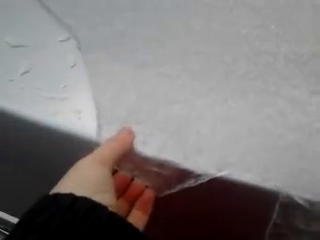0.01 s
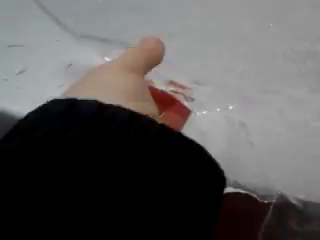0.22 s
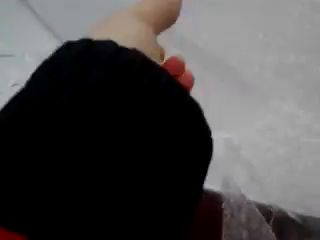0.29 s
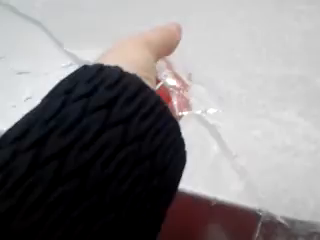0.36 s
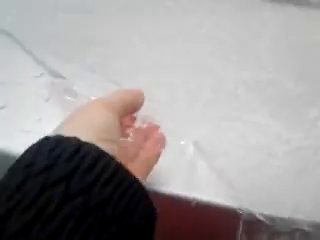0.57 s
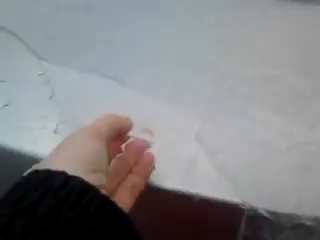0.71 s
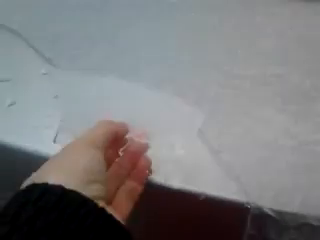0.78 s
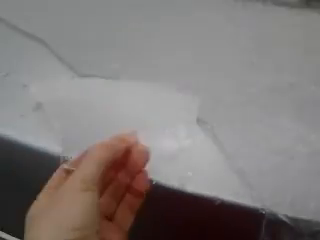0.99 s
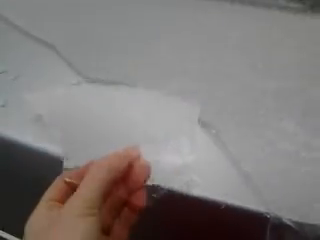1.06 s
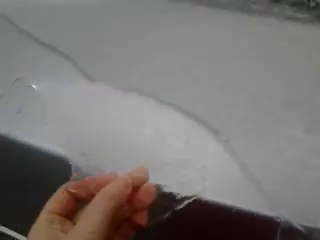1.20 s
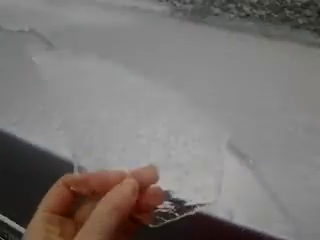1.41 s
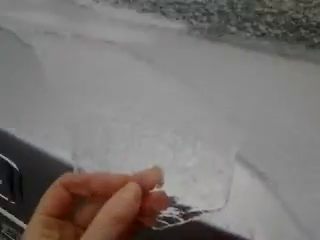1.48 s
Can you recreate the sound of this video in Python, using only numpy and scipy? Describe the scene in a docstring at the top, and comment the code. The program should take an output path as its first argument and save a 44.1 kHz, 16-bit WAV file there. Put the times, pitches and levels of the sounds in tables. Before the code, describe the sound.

A thin sheet of glaze ice snaps sharply off a car panel in quick brittle cracks

```python
"""A faint scrape and a little grit over a quiet outdoor hiss, then ice breaking close by:
a hand prises a sheet of glaze ice off a car's body.
The sheet snaps in quick runs of tiny fractures that knock the slab, ring the sheet and set shards off.
The metal panel below thumps as the load lets go: a short low push, then a damped ring.
Grit, scrapes, a sleeve's rustle and the outdoor air are noise, each with its own colour and loudness."""
import sys
import numpy as np
from scipy import signal
from scipy.fft import rfft, irfft, next_fast_len
from scipy.io import wavfile

SR = 44100
rng = np.random.default_rng(int(sys.argv[2]) if len(sys.argv) > 2 else 0)


def persist_wave(psi):
    """Save psi, clipped to +-1, as 16-bit WAV."""
    counts = np.round(np.clip(psi, -1, 1) * 32767).astype(np.int16)
    wavfile.write(sys.argv[1], SR, np.atleast_2d(counts).T)


N = 70560  # length in samples

GRAIN_SCATTER_DB = 3.5  # uneven strength of single grains, in grit and scrapes


def amp(db):
    """Turn decibels into a gain."""
    return 10 ** (np.asarray(db) / 20)


def unit(x):
    """Scale a sound to an rms of 1."""
    return x / np.sqrt(np.mean(x ** 2) + 1e-20)


def along(points, hz):
    """Read a curve of (Hz, value) points at any frequency, on a log axis."""
    point_hz, values = np.transpose(points)
    return np.interp(np.log(hz + 1), np.log(point_hz + 1), values)


def level(rows):
    """Gain for every sample from (s, dB) points; the end values hold outside them."""
    return amp(np.interp(np.arange(N) / SR, *np.transpose(rows)))


def filtered(x, response):
    """Multiply the spectrum of x by a response that depends on frequency."""
    size = next_fast_len(2 * len(x))  # room for the filter's tail
    spectrum = rfft(x, size) * response(np.fft.rfftfreq(size, 1 / SR))
    return irfft(spectrum, size)[:len(x)]


def coloured(x, colour):
    """Shape noise with a curve of (Hz, dB) points, at an rms of 1."""
    return unit(filtered(x, lambda hz: amp(along(colour, hz))))


def resonance(f, hz, width):
    """One thing that rings at hz: the narrower its width, the longer it rings."""
    return 1j * f * width / (hz * hz - f * f + 1j * f * width)


def add(track, s, sound):
    """Mix a sound into the track at s seconds."""
    i = max(round(s * SR), 0)
    track[i:i + len(sound)] += sound[:len(track) - i]


def cracks():
    """Every fracture knocks the whole slab, rings the ice sheet and sets small shards off."""
    # Each row: start in seconds, time the fracture runs in seconds, knock level in dB, knock pitch in Hz,
    # ring level in dB, ring pitch in Hz, splinter level in dB, splinter pitch in Hz.
    crack_rows = [(0.07, 0.0035, -73, 950, -56, 4390, -45, 8750),
                  (0.2068, 0.0037, -32, 1460, -26, 2072, -20.5, 7200),
                  (0.2128, 0.0028, -26, 1410, -12.5, 2200, -11.5, 6830),
                  (0.2201, 0.0027, -20.5, 1330, -11, 3088, -16, 6700),
                  (0.229, 0.006, -30.5, 1230, -26.5, 1810, -32.5, 6550),
                  (0.257, 0.0054, -45, 1460, -41, 1830, -44, 9100),
                  (0.2628, 0.0043, -43, 1170, -37.5, 1840, -41.5, 7480),
                  (0.319, 0.006, -44, 1010, -39.5, 3140, -64, 6980),
                  (0.338, 0.006, -30, 880, -29, 2930, -29.5, 9100),
                  (0.3428, 0.0017, -24.5, 1200, -14, 2780, -18, 6350),
                  (0.372, 0.0005, -36, 1040, -39, 2870, -38, 9000),
                  (0.386, 0.0031, -43, 1160, -25.5, 2760, -34, 6700),
                  (0.4217, 0.0059, -30, 1480, -21.5, 2080, -20.5, 7300),
                  (0.433, 0.011, -35, 710, -30, 1990, -29, 9400),
                  (0.4498, 0.00098, -24.5, 690, -20.5, 2330, -31.5, 7100),
                  (0.461, 0.0033, -32, 687, -44, 2240, -46, 8760),
                  (0.4749, 0.0029, -29, 734, -28.5, 2068, -28.5, 6700),
                  (0.4905, 0.0034, -42, 815, -58, 1980, -47, 7030),
                  (0.6555, 0.00088, -28, 786, -17, 2370, -24, 8860),
                  (0.6598, 0.0016, -26, 853, -25.5, 2763, -25, 8000),
                  (0.7604, 0.0023, -51, 603, -47, 2050, -47, 7750),
                  (0.778, 0.00043, -40.5, 1270, -38.5, 2270, -39, 7400),
                  (0.791, 0.003, -51, 1370, -41, 2080, -62, 6920),
                  (0.8038, 0.00067, -50, 650, -44, 2120, -69, 8900),
                  (0.8175, 0.001, -53, 1370, -43, 2140, -65, 8810),
                  (0.8252, 0.0046, -53, 1440, -39, 2235, -48, 8740),
                  (0.8396, 0.0016, -44, 1280, -47.5, 2180, -64, 8610),
                  (0.8448, 0.00097, -43.5, 960, -38, 2170, -43.5, 6770),
                  (0.9512, 0.0046, -58.5, 597, -40.5, 3510, -36, 7220),
                  (0.964, 0.0061, -41.5, 900, -54, 2610, -42, 9300),
                  (0.9732, 0.002, -48, 880, -46.5, 2320, -50, 8500),
                  (0.9874, 0.0017, -36.5, 850, -48, 3100, -58, 6830),
                  (1.0036, 0.0046, -64, 690, -44, 3040, -41.5, 7200),
                  (1.0474, 0.00041, -72, 750, -52.5, 2040, -42.5, 8700),
                  (1.073, 0.00073, -78, 990, -48, 3190, -54, 6330),
                  (1.095, 0.0018, -60, 1060, -41.5, 3600, -38, 11000),
                  (1.1044, 0.0004, -74, 1080, -41, 3040, -44.5, 6900),
                  (1.1942, 0.0026, -33.5, 1026, -43, 3230, -43, 7020),
                  (1.1992, 0.00084, -35.5, 950, -34.5, 2220, -31, 7460),
                  (1.3008, 0.003, -61, 800, -66, 2360, -43, 8900)]
    # What rings: the slab knocking on the panel, the ice sheet, the small shards.
    # Each row: pitch in Hz, width in Hz, strength in dB per Hz of width, relative to the other rows.
    slab_modes = [(450, 230, 0.5), (667, 120, 2), (836, 193, -3), (1068, 80, 0), (1440, 520, -5)]
    sheet_modes = [(1658, 230, -7), (1963, 132, 2), (2160, 110, 2), (2530, 240, -1), (2792, 165, 0.5),
                   (3025, 140, -1), (3264, 240, 0), (3730, 300, -1), (4240, 320, 0.5), (4620, 175, 2.5),
                   (5600, 740, -5.5)]
    shard_modes = [(5770, 130, -7.5), (6180, 120, 1.5), (6810, 380, 2), (7620, 400, 1.5), (8900, 540, 2.5),
                   (9900, 720, -0.5), (11150, 1300, -5.5), (13200, 630, -1.5), (15100, 1200, -7)]
    knock_octaves, ring_octaves, splinter_octaves = 0.86, 0.68, 0.65  # spread about each pitch
    out = np.zeros(N)
    for s, run_s, knock_db, knock_hz, ring_db, ring_hz, splinter_db, splinter_hz in crack_rows:
        force = fracture(run_s, max(knock_db, ring_db))
        knock = amp(knock_db) * struck(force, slab_modes, knock_hz, knock_octaves)
        ring = amp(ring_db) * struck(force, sheet_modes, ring_hz, ring_octaves)
        splinter = amp(splinter_db) * struck(force, shard_modes, splinter_hz, splinter_octaves)
        add(out, s, knock + ring + splinter)
    return bent(out)


def fracture(run_s, size_db):
    """A burst of tiny uneven fractures grows, runs out and leaves crumbs; small cracks break more cleanly."""
    rise_share = 0.2  # part of the run spent growing
    spiky_db = 1.5  # scatter of the tiny fractures
    crumble_db, crumble_s = -10.5, 0.03  # crumbs of a big crack, and the time they take to fall 60 dB
    big_crack_db, cleaner_per_db = -31, 1  # below this size, each dB smaller makes the crumbs weaker
    t = np.arange(SR // 12) / SR
    u = t / max(run_s, 1e-4)  # time counted in runs
    crumb_db = crumble_db + cleaner_per_db * min(size_db - big_crack_db, 0)
    crumbs = amp(crumb_db - 60 * t / crumble_s)
    burst = np.minimum(u / rise_share, 1) * (np.exp(-u ** 2) + crumbs)
    push_or_pull = np.sign(rng.standard_normal(len(t)))
    return burst * push_or_pull * amp(spiky_db * rng.standard_normal(len(t)))


def struck(force, modes, pitch_hz, octaves):
    """A force rings the shared modes near a pitch, and the breaking piece at that pitch itself."""
    piece_db, piece_q = -4, 14  # the piece: level against the shared modes, sharpness
    f = np.fft.rfftfreq(2 * len(force), 1 / SR) + 1
    drive = rfft(force, 2 * len(force))
    hz, width, db = np.transpose(modes)[:, :, None]
    rings = drive * resonance(f, hz, width)
    rings *= amp(db) * np.sqrt(np.abs(width)) / np.linalg.norm(rings, axis=1, keepdims=True)
    near = np.exp(-.5 * (np.log2(f / pitch_hz) / octaves) ** 2)
    # every second mode swings the other way
    shared = unit(irfft(near * (rings[::2].sum(0) - rings[1::2].sum(0))))
    piece = unit(irfft(drive * resonance(f, pitch_hz, pitch_hz / piece_q)))
    # give the piece the sign that adds to the shared modes
    both = shared + np.copysign(amp(piece_db), shared @ piece) * piece
    both = both[:len(force)]
    return both * np.sqrt(.004 * SR / np.sum(both ** 2))  # the energy of 4 ms at rms 1


def bent(x):
    """Waves in the thin sheet travel slower the lower they are, so each snap chirps down."""
    lag_s = 0.000556  # the delay is lag_s * (sqrt(1000 / f) - 1/4): none at 16 kHz
    return filtered(x, lambda f: np.exp(-2j * np.pi * lag_s * (2 * np.sqrt(1000 * f) - f / 4)))


def panel():
    """The metal panel springs back: a short low push, then its damped modes ring."""
    # Each row: start in seconds, level of the push in dB, pitch in Hz.
    thump_rows = [(0.2131, -21.5, 236), (0.2239, -17.5, 313), (0.2326, -25, 194), (0.256, -46, 320),
                  (.345, -32, 413), (0.3593, -26.5, 237), (0.3655, -30, 138), (0.4227, -24.5, 157),
                  (0.4346, -23.5, 257), (0.4457, -21.5, 257), (0.4519, -21, 355), (0.4768, -27, 320),
                  (0.491, -47, 267), (0.567, -47, 350), (.609, -47, 332), (0.6594, -30.5, 315),
                  (.7785, -26, 270), (0.8175, -44, 263), (0.8442, -32, 259), (0.8632, -34.5, 278),
                  (.965, -43, 350), (.99, -44, 254), (1.1953, -33.5, 345)]
    # The panel's own modes. Each row: pitch in Hz, relative level in dB, time to fall 60 dB in seconds.
    panel_modes = [(143, -3.5, 0.12), (162, 8, 0.069), (250, -3, 0.04), (299, -7, 0.033), (371, -8, 0.047),
                   (459, -7, .1), (693, -11, 0.35)]
    push_cycles, ring_db = 2.48, -9  # length of the push in cycles; gain of the ring beside it
    near_octaves = 1  # a thump rings the modes near its own pitch
    mode_scatter_db, mode_detune = 2, 0.02  # random differences from thump to thump
    out = np.zeros(N)
    t = np.arange(SR // 5) / SR
    for s, db, hz in thump_rows:
        u = np.minimum(hz * t / push_cycles, 1)  # 0 to 1 over the push
        push = np.sin(2 * np.pi * hz * t) * np.sin(np.pi * np.sqrt(u)) ** 2
        ring = np.zeros(len(t))
        for f, mode_db, t60 in panel_modes:
            decay = amp(mode_db + mode_scatter_db * rng.standard_normal() - 60 * t / t60)
            near = np.exp(-.5 * (np.log2(f / hz) / near_octaves) ** 2)
            mode_hz = f * (1 + rng.normal(0, mode_detune))
            ring += decay * near * np.sin(2 * np.pi * mode_hz * t)
        add(out, s, amp(db) * (push + amp(ring_db) * u * ring))
    return out


def echo(x):
    """A short diffuse answer from the car and the ground: noise that dies away, about 3 ms late."""
    # How long the echo lasts. Each row: frequency in Hz, time to fall 60 dB in seconds.
    echo_t60 = [(150, 0.12), (800, 0.12), (3000, 0.11), (10000, 0.11)]
    # Tone of the echo. Each row: frequency in Hz, gain in dB.
    echo_colour = [(100, 7), (800, 1.5), (2500, -8), (7000, -11.5), (15000, -2.5)]
    hz, t, cells = signal.stft(rng.standard_normal(SR // 3), SR, nperseg=256)
    fade = amp(-60 * t / along(echo_t60, hz)[:, None])
    tail = signal.istft(cells * fade, SR, nperseg=256)[1]
    late_tail = np.pad(tail, (SR // 300, 0)) / np.linalg.norm(tail)
    wet = signal.fftconvolve(x, late_tail)[:N]
    return filtered(wet, lambda f: amp(along(echo_colour, f)))


def grit():
    """Dense tiny random ticks where the loosened ice rubs."""
    # Loudness of the grit. Each row: time in seconds, level in dB.
    grit_level = [(0, -54), (.07, -64.5), (.16, -74.5), (.24, -36), (.3, -47.5), (.37, -36), (.41, -46.5),
                  (.5, -49), (.56, -55.5), (.61, -55.5), (.8, -59), (.84, -45), (.9, -68), (.97, -45.5),
                  (1.03, -55.5), (1.3, -66.5), (1.6, -70)]
    # Tone of the grit. Each row: frequency in Hz, relative level in dB.
    grit_colour = [(300, 7), (1000, -2.5), (2800, -1.5), (5200, -10), (6800, -3), (9000, -7),
                   (12000, -23.5), (16000, -23)]
    ticks_per_s = 4400
    ticks = (rng.random(N) < ticks_per_s / SR) * rng.standard_normal(N)
    ticks = ticks * amp(GRAIN_SCATTER_DB * rng.standard_normal(N))
    return level(grit_level) * coloured(ticks, grit_colour)


def scrapes():
    """The edge of the sheet scrapes: short bright swishes of grainy noise that swell and fade."""
    # Each row: middle in seconds, time from there to fade to about a third in seconds, level in dB.
    scrape_rows = [(.01, 0.021, -41.5), (0.97, 0.012, -45.5)]
    # Tone of ice on ice. Each row: frequency in Hz, relative level in dB.
    scrape_colour = [(1000, -16), (4000, -10.5), (6000, -6.5), (7000, -4.5), (9200, 3), (12000, -1.5),
                     (15500, -18)]
    t = np.arange(N) / SR
    stroke = sum(amp(db) * np.exp(-((t - s) / length) ** 2) for s, length, db in scrape_rows)
    grains = rng.standard_normal(N) * amp(GRAIN_SCATTER_DB * rng.standard_normal(N))
    return stroke * coloured(grains, scrape_colour)


def sleeve():
    """Soft noise of a knitted sleeve, faint throughout and a little louder near the end."""
    # Loudness of the rustle. Each row: time in seconds, level in dB.
    sleeve_level = [(1.38, -56.5), (1.49, -50), (1.6, -50.5)]
    # Tone of the rustle. Each row: frequency in Hz, relative level in dB.
    sleeve_colour = [(200, 1), (900, 0.5), (2100, 3.5), (4000, 2), (5200, -5.5), (7000, 1.5), (10000, -11),
                     (15000, -20)]
    return level(sleeve_level) * coloured(rng.standard_normal(N), sleeve_colour)


def air():
    """Steady outdoor rumble and hiss: coloured noise."""
    # Tone of the outdoors. Each row: frequency in Hz, relative level in dB per Hz.
    air_colour = [(15, -30), (25, 5.5), (141, 7.5), (236, 0), (363, -4), (734, -10.5), (988, -7.5),
                  (1740, -21), (2050, -6.5), (2550, -29), (3920, -40.5), (6210, -17.5), (9070, -11.5),
                  (12900, -16.5), (16000, -21.5)]
    air_db = -53.5
    return amp(air_db) * coloured(rng.standard_normal(N), air_colour)


def scene():
    """The breaking ice with its echo, over the quiet sounds."""
    echo_db = -12.5
    ice = cracks() + panel()
    quiet = grit() + scrapes() + sleeve() + air()
    return (ice + amp(echo_db) * echo(ice) + quiet)[None]


def record(dry):
    """The recorder thins the deep bass, rounds off the loudest peaks and keeps nothing above its band limit."""
    low_cut_hz, top_hz = 41, 15900
    clip_level = 0.68  # the rounded peaks stay below this
    low_cut = signal.butter(2, low_cut_hz, "high", fs=SR, output="sos")
    x = signal.sosfilt(low_cut, dry[0])
    x = x / (1 + np.abs(x / clip_level) ** 4) ** (1 / 4)
    return filtered(x, lambda hz: hz < top_hz)[None]


dry = scene()
out = record(dry)
persist_wave(out)
```